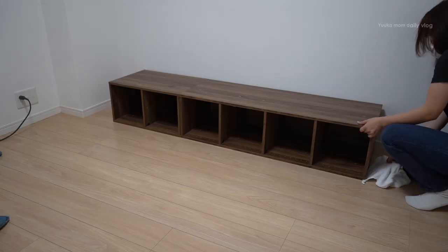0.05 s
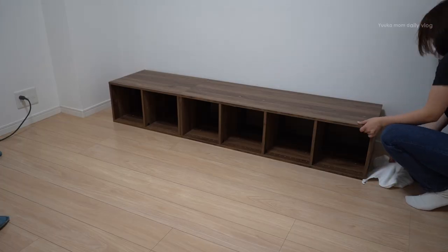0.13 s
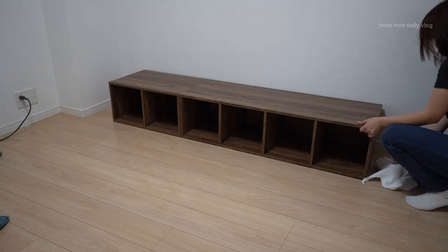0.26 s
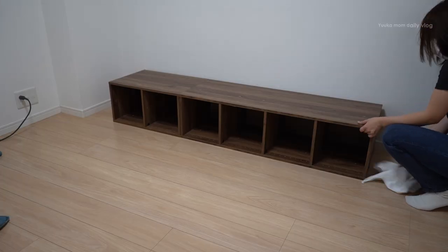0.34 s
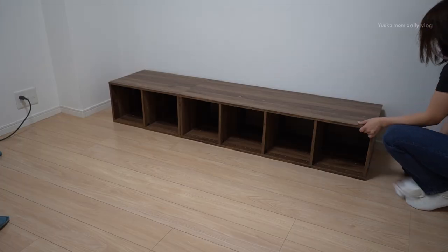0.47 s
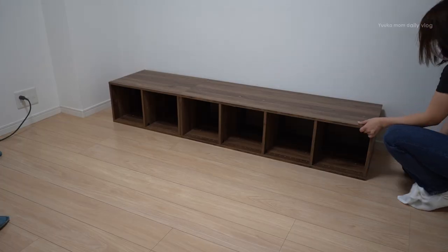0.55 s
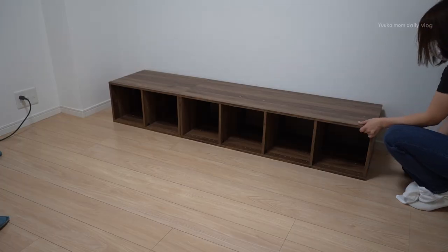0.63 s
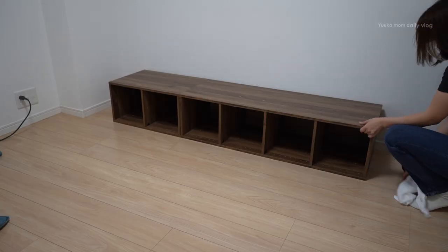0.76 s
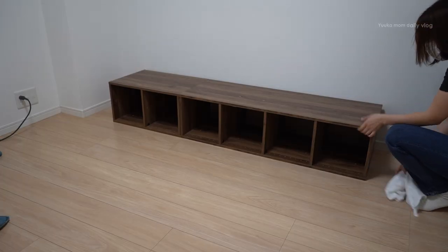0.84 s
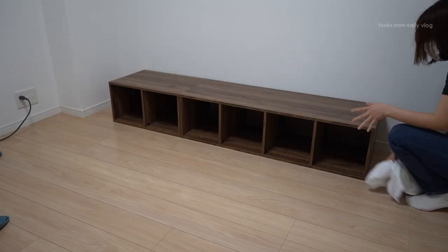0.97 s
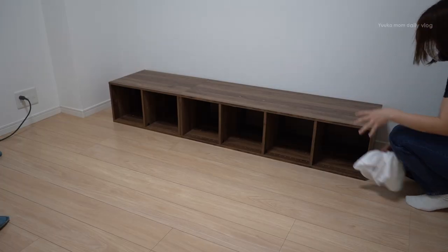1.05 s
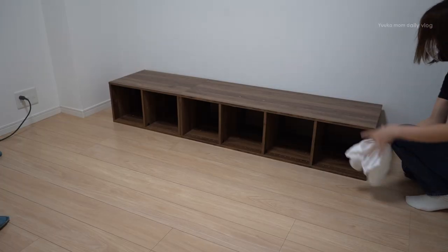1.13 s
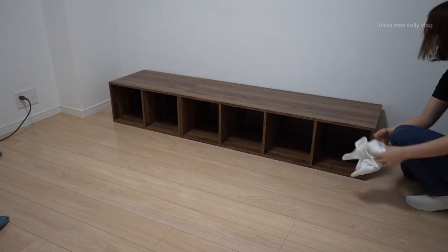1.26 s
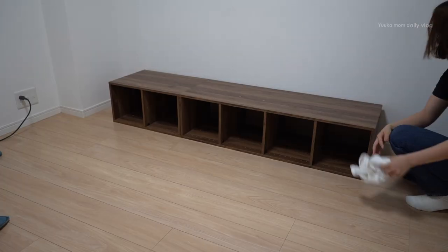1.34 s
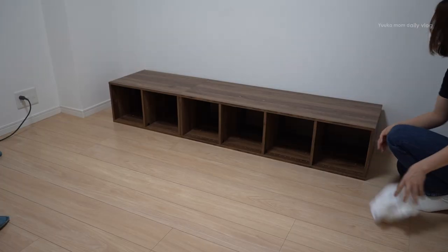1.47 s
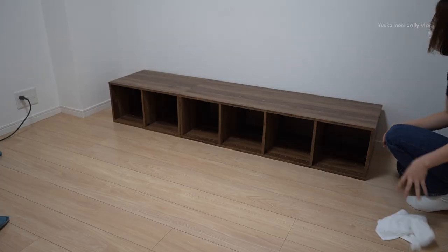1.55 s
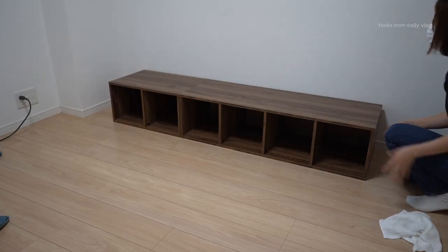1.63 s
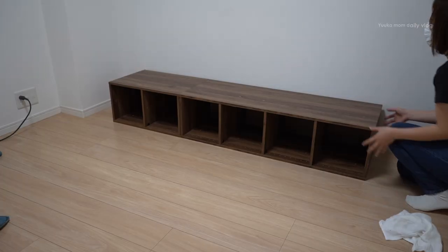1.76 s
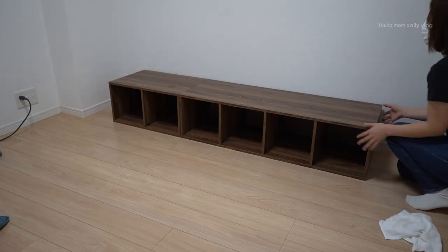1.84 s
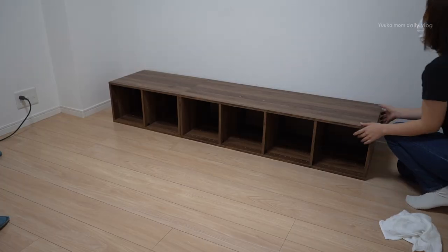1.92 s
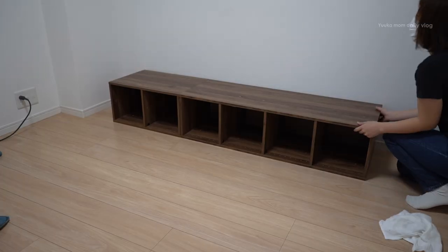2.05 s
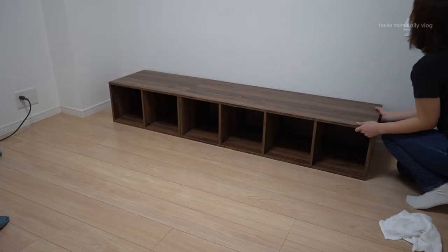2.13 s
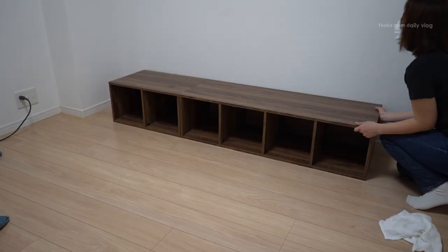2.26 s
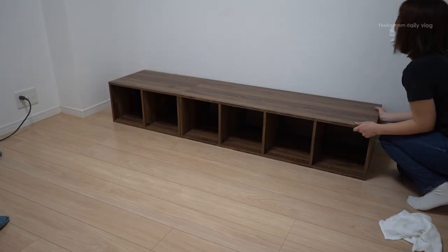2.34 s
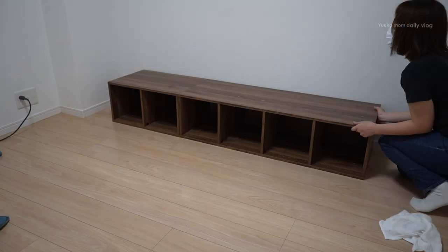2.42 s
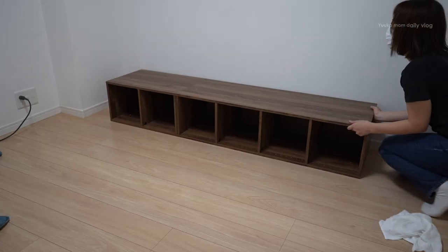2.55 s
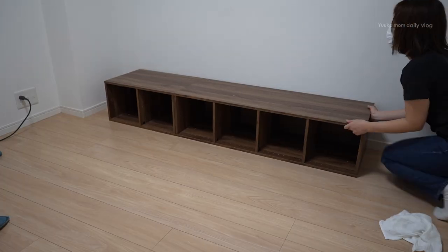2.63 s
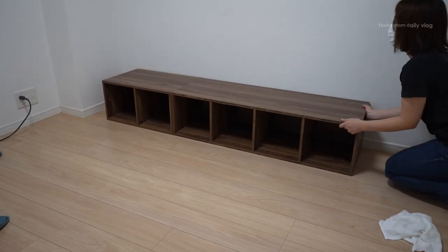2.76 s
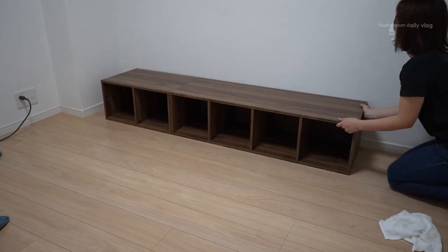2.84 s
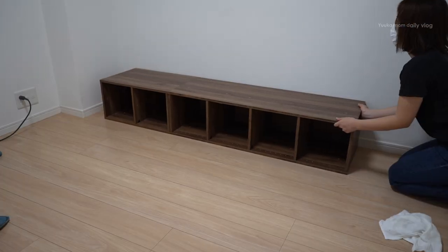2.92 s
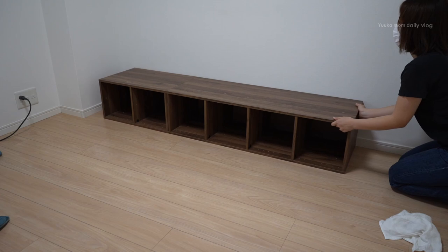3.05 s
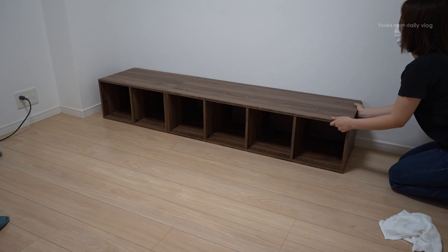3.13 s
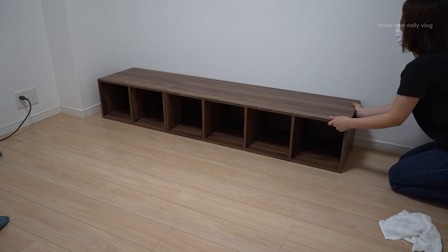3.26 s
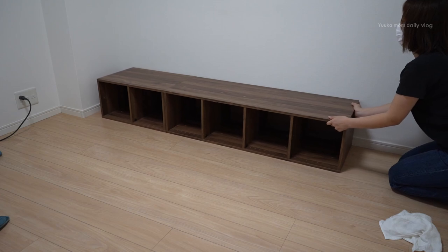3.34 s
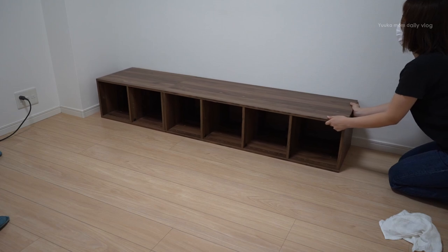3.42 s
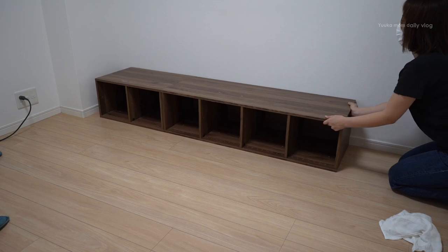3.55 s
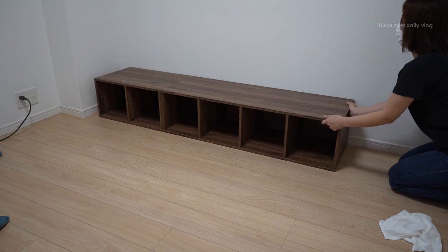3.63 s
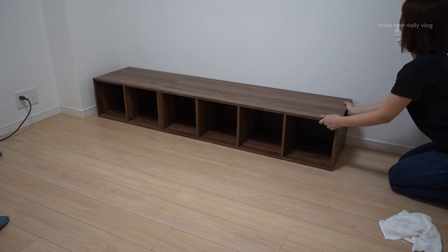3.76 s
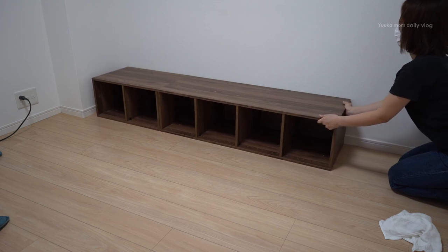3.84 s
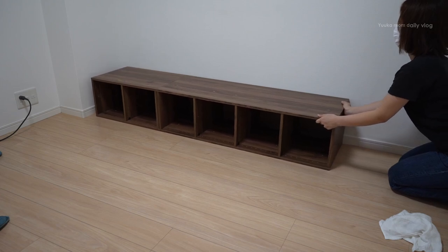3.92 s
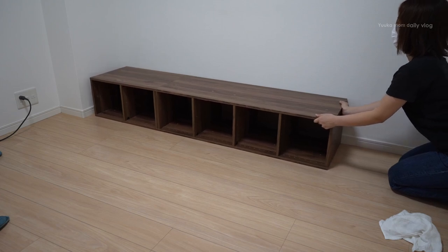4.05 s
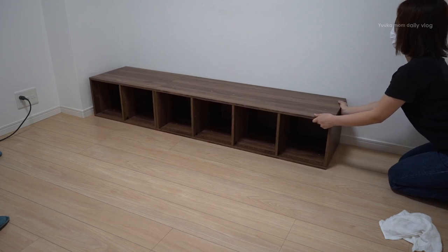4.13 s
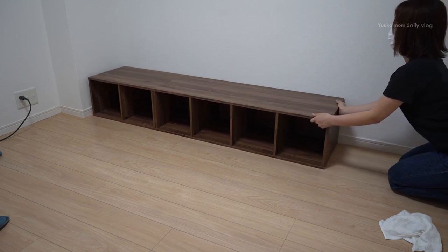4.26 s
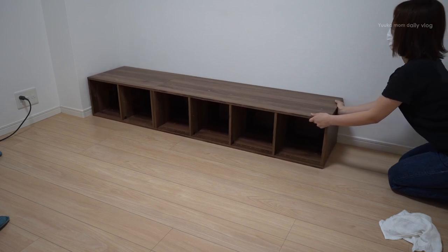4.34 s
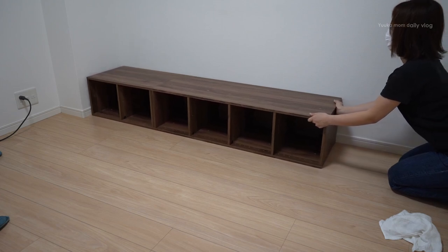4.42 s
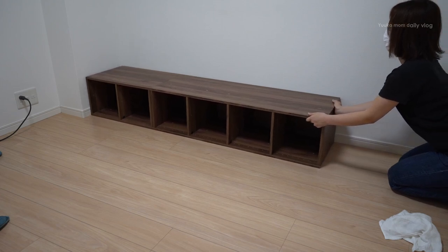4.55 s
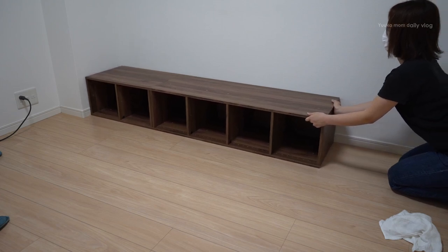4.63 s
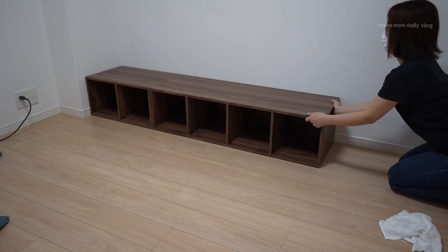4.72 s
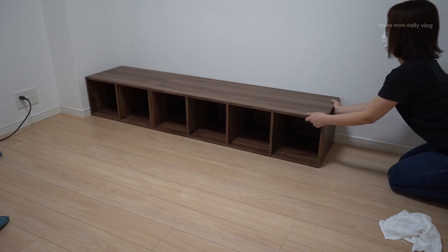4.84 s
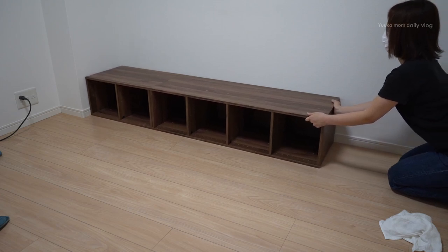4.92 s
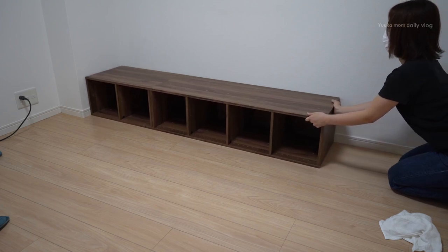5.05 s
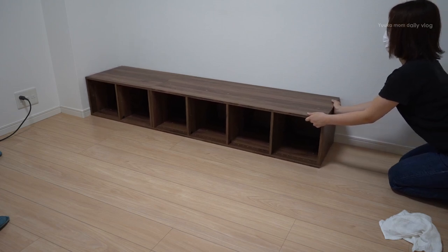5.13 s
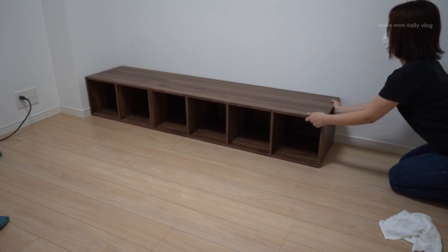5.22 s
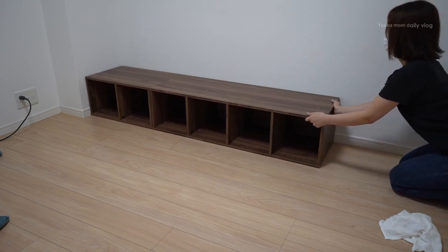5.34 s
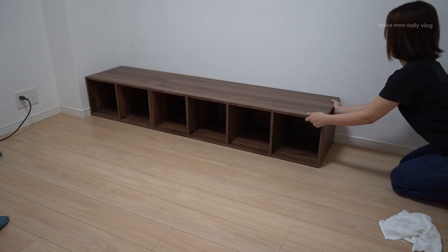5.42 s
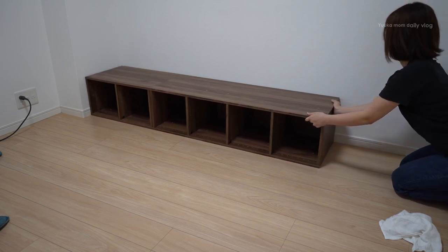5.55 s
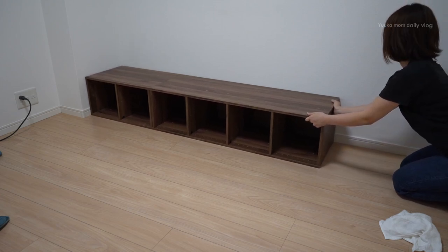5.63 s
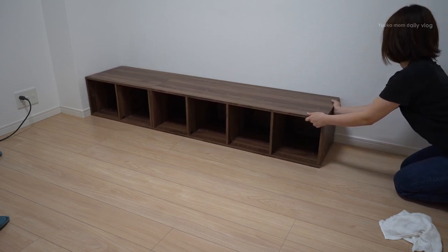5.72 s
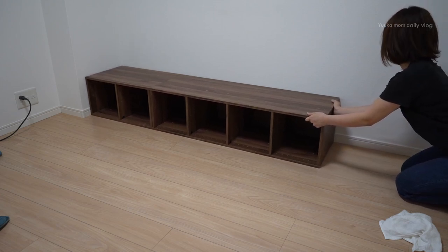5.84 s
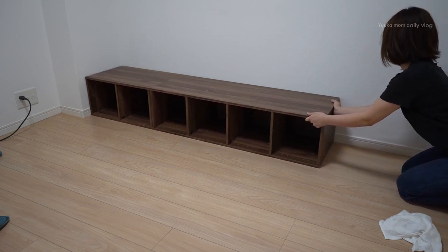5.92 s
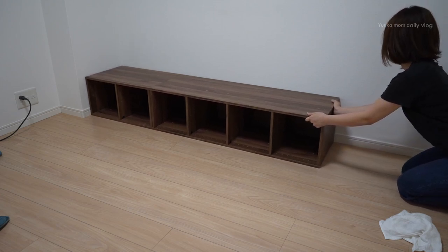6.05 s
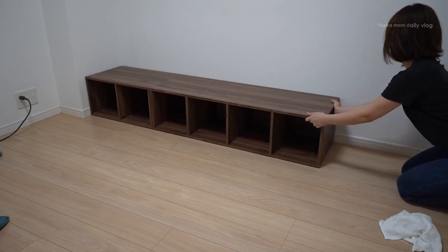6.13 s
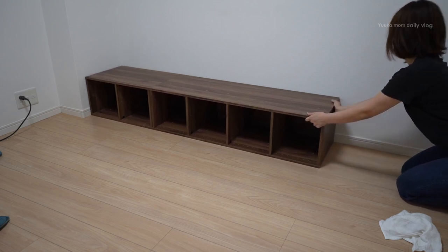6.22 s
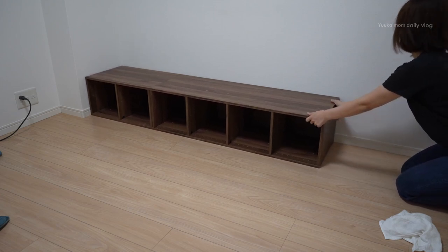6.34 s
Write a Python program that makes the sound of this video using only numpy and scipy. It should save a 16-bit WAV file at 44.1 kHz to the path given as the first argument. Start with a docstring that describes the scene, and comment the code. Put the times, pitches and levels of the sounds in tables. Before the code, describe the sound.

In a quiet, bare bedroom, cloth and jeans brush softly while hands tap a hollow wooden shelf and small ticks sound. The shelf is then pushed along a laminate floor with a broad hiss and gritty scrape, while knees thump low on the boards. A loud hollow knock ends the drag; softer bumps follow. Stereo microphones about two metres away catch a half-second room ring, faint hiss and low outside hum.

```python
"""A long wooden cube shelf is pushed along a laminate floor, two metres from a stereo pair of microphones.
Broad noise makes the swish of cloth, jeans and dust; narrower noise makes the edge's scrape and hollow rub.
Decaying modes sound the hollow shelf under noisy shaking and knocks; low sines are knees and feet on the boards.
The bedroom is bare and quiet: knocks and small ticks ring for about half a second between empty walls,
over room tone, microphone hiss and a low hum from outside."""
import sys
import numpy as np
from scipy import signal
from scipy.fft import rfft, irfft
from scipy.io import wavfile
from scipy.ndimage import uniform_filter1d

SR = 44100
rng = np.random.default_rng(int(sys.argv[2]) if len(sys.argv) > 2 else 0)


def rack_gain(trim_db):
    """Turn a fader trim in dB into the linear factor to multiply a signal by."""
    fader = np.asarray(trim_db, float)
    return 10 ** (fader / 20)


def wav_record(signal):
    """Record a signal, one row per channel, as 16-bit PCM in the file named by sys.argv[1]."""
    frames = np.transpose(np.atleast_2d(signal))
    bounded = np.clip(frames, -1, 1)
    # unit amplitude maps onto the largest positive 16-bit level
    quanta = np.round(bounded * 32767).astype(np.int16)
    wavfile.write(sys.argv[1], SR, quanta)


N = 281358
T = np.arange(N) / SR
HZ = np.maximum(np.fft.rfftfreq(N, 1 / SR), 1)

# shelf edge dragged over the boards: (time [s], level before flicker [dB])
EDGE_DRAG = [(2.32, -63.5), (2.55, -56.5), (2.85, -55), (3.12, -57), (3.94, -53.5), (4.66, -55)]


def on_log(table):
    """Gain at every frequency, joined on a log axis from (frequency [Hz], level [dB]) points."""
    hz, db = np.transpose(table)
    return rack_gain(np.interp(np.log(HZ), np.log(hz), db))


def curve(table, column=1, off_db=-120):
    """Gain over time from one dB column of a table, off_db outside its times."""
    rows = np.array(table)
    return rack_gain(np.interp(T, rows[:, 0], rows[:, column], left=off_db, right=off_db))


def stroke(peak_s, db, swell_s, fade_s):
    """Gain of one stroke: climbs 20 dB in swell_s to its loudest point, then falls 20 dB per fade_s."""
    return rack_gain(db - 20 * np.maximum((peak_s - T) / swell_s, (T - peak_s) / fade_s))


def walk(rate):
    """Random levels held 1 / rate seconds and slewed twice; spread near 1."""
    hold = int(SR / rate)
    steps = np.repeat(rng.standard_normal(N // hold + 1), hold)
    return 1.3 * uniform_filter1d(uniform_filter1d(steps, hold), hold)[:N]


def pair(mid, side):
    """Two microphones a few centimetres apart in a diffuse room: alike in the bass, wider in the treble."""
    # (frequency [Hz], gain of side against mid [dB])
    side_width = [(60, -49), (110, -28), (200, -19.5), (380, -15), (700, -7), (1290, -5.5), (2380, -0.5),
                  (4400, 2), (8120, -0.5), (15000, -1.5)]
    # (frequency [Hz], left minus right [dB])
    left_lean = [(60, 1), (110, -2), (200, 0.5), (380, -0.5), (700, -1), (1290, -1.5), (2380, -1.5),
                 (4400, 0.5), (8120, -5), (15000, 1.5)]
    side = side * on_log(side_width)
    tilt = np.sqrt(on_log(left_lean))
    left = irfft((mid + side) * tilt, N)
    right = irfft((mid - side) / tilt, N)
    return np.array([left, right])


def hiss(gain, lo_hz, hi_hz):
    """Coloured stereo noise, scaled so that its mid has rms 1 between two frequencies before the lean."""
    mid, side = gain * rfft(rng.standard_normal((2, N)))
    inside = (HZ > lo_hz) & (HZ < hi_hz)
    return pair(mid, side) / np.sqrt(2 * np.sum(gain[inside] ** 2) / N)


def band(hz, width_hz):
    """Noise around one resonance, rms near 1."""
    return hiss(1 / (1 + (2 * (HZ - hz) / width_hz) ** 2), hz / 2, hz * 2)


def room_tail(start_s, t60_s):
    """Envelope of a short event: a brief direct snap, then the sound it leaves in the room."""
    snap_db, snap_s, build_s = 4.5, 0.0031, 0.0055
    t = np.maximum(T - start_s, 0)
    # the straight path comes before the walls answer
    snap = (T > start_s) * rack_gain(snap_db) * np.exp(-t / snap_s)
    walls = (1 - np.exp(-t / build_s)) * rack_gain(-60 * t / t60_s)
    return snap + walls


def swish():
    """Smooth broad friction hiss of cloth and floor; its finest part is set separately for each stroke."""
    # (frequency [Hz], relative level per Hz [dB])
    swish_colour = [(880, -15.5), (1500, -3), (1860, -1.5), (1990, 0), (6820, -2), (9140, -6.5),
                    (15500, -20)]
    # two long pushes, dust and edge hissing on the floor:
    # (time [s], body level before flicker [dB], finest hiss against body [dB])
    long_pushes = [
        [(2.3, -83, 1), (2.36, -67.5, -2.5), (2.47, -50.5, -5), (2.55, -49, -1.5), (2.7, -47, -0.5),
         (2.87, -47, -3.5), (3.09, -54.5, -11), (3.23, -59.5, -13), (3.77, -53.5, -9), (4.48, -58, -12.5),
         (4.6, -62, -20)],
        [(5.17, -77, -7), (5.356, -65.5, -8), (5.848, -60.5, -4), (5.946, -61, -6), (6.04, -69.5, -10),
         (6.12, -83, -12)],
    ]
    # light brushes of cloth and jeans: (loudest time [s], body level before flicker [dB],
    # swell per 20 dB [s], fade per 20 dB [s], finest hiss against body [dB])
    light_brushes = [(0.0, -69, .05, 0.14, -1), (.118, -63.5, 0.11, 0.27, 0), (.24, -65.5, .2, 0.31, -6),
                     (.365, -69, 0.069, 0.25, 1), (1.15, -77, 0.25, .8, 3), (1.385, -67.5, 0.47, 0.51, -5),
                     (1.776, -71, 0.094, 0.15, 1.5), (2.054, -72.5, 0.42, 0.28, 0.5),
                     (2.23, -78.5, .1, 0.64, 2), (5.036, -75, 0.022, 0.15, -4), (5.2, -74, 0.073, 0.37, -2),
                     (6.14, -74.5, 0.054, 0.097, -2), (6.38, -76.5, 0.25, .1, 0.5)]
    strokes = [curve(push) for push in long_pushes]
    strokes += [stroke(*row[:4]) for row in light_brushes]
    fine_shares = [curve(push, column=2) for push in long_pushes]
    fine_shares += [rack_gain(row[4]) for row in light_brushes]
    # power crossover at 9.2 kHz between body and finest hiss
    top = 1 / (1 + (9200 / HZ) ** 8)
    body = hiss(on_log(swish_colour) * np.sqrt(1 - top), 2720, 15000)
    fine = hiss(on_log(swish_colour) * np.sqrt(top), 8000, 27600)
    body_gain = np.sqrt(sum(g ** 2 for g in strokes))
    fine_gain = np.sqrt(sum((g * share) ** 2 for g, share in zip(strokes, fine_shares)))
    flicker = rack_gain(0.5 * walk(11))
    return flicker * (body_gain * body + fine_gain * fine)


def fizz():
    """One very thin, airy brush: a swell of noise around 12.5 kHz alone."""
    return stroke(5.245, -62.5, swell_s=0.092, fade_s=0.15) * band(12500, width_hz=6300)


def scrape():
    """Dense grit under the edge as noise, its grip flickering, and one short singing slip as a sine."""
    # (frequency [Hz], relative level per Hz [dB])
    grit_colour = [(350, -16.5), (600, -10), (750, -8), (990, -3), (1200, -4.5), (1400, -1), (1580, 0.5),
                   (1850, -3), (2200, -2), (2450, -4), (2750, -2), (3500, -8.5), (5000, -18), (6500, -21)]
    slip_s, slip_length_s, slip_hz, slip_db = 2.70, 0.08, 443, -60
    grip = stroke(slip_s, slip_db, swell_s=0.08, fade_s=9) * (T < slip_s + slip_length_s)
    # 300-sample smoothing softens the cut; sqrt(2) makes the level an rms
    slip = np.sqrt(2) * uniform_filter1d(grip, size=300) * np.sin(2 * np.pi * slip_hz * T)
    flicker = rack_gain(0.11 * walk(25.6))
    grit = curve(EDGE_DRAG) * flicker * hiss(on_log(grit_colour), 1460, 2690)
    return slip + grit


def rub():
    """Noise around one hollow resonance in a compartment, from a short rub and under the dragged edge."""
    short_rub = stroke(1.6, -67, swell_s=0.06, fade_s=0.55)
    under_edge = rack_gain(-12.5) * curve(EDGE_DRAG)
    return (short_rub + under_edge) * band(1550, width_hz=350)


def shelf_gain():
    """Complex response of the hollow shelf: decaying modes, neighbours swinging in opposite phase."""
    # (frequency [Hz], relative level [dB], T60 [s])
    shelf_modes = [(123, -61, 0.12), (151, 2.5, 0.21), (187, -1, 0.24), (214, 4, 0.24), (290, -1, 0.11),
                   (339.7, 2, 0.18), (390.5, -9.5, 0.32), (439, -7.5, 0.17), (521, -4, 0.12),
                   (576, -13, 0.33), (656.7, -10, 0.36), (683, -27, 0.98), (710, -11.5, 0.33),
                   (806.5, -14, 0.39), (900, -15.5, 0.11), (1003, -18, 0.13), (1146, -16.5, 0.1)]
    ring = 0
    for k, (hz, db, t60_s) in enumerate(shelf_modes):
        ring = ring + (-1) ** k * rack_gain(db - 60 * T / t60_s) * np.sin(2 * np.pi * hz * T)
    ring = ring / np.max(np.abs(ring))
    # the panels radiate little below their lowest modes
    return rfft(ring) / (1 + 125 / (1j * HZ)) ** 3


def shake():
    """Hands and friction shake the shelf body: an uneven noise force coloured by the shelf modes."""
    # (time [s], level before unevenness [dB])
    shake_levels = [(0.0, -81), (0.2, -66.5), (0.46, -69), (1.15, -80.5), (1.7, -65.5), (2.06, -84),
                    (2.38, -59), (2.77, -56), (3.14, -63.5), (4.05, -60.5), (4.69, -63), (4.87, -68.5),
                    (5.65, -65), (6.38, -68.5)]
    uneven = rack_gain(0.9 * walk(18))
    return curve(shake_levels) * uneven * hiss(np.abs(shelf_gain()) ** 0.51, 96, 1200)


def softness(hz, contact_ms):
    """Spectrum of a push: two equal low-pass poles, duller the longer the contact."""
    return 1 / (1 + 2j * np.pi * hz * contact_ms / 1000) ** 2


def knocks():
    """Blows ring the shelf modes directly; cracks and scattered ring reach the microphones by the room."""
    # blows on the shelf: (time [s], relative strength [dB], relative crack against the blow [dB],
    # contact time constant [ms], frequency of the panel nearest the blow [Hz])
    blows = [(0.131, -52, -8.5, 0.79, 193), (.371, -47.5, 2, 0.22, 365), (.379, -40.5, -10, 0.34, 345),
             (.393, -43, -11, 0.27, 198), (1.511, -55, -6, 0.71, 166), (1.571, -55, 2.5, 0.46, 159),
             (2.203, -51, -7, 0.085, 600), (2.223, -57, -8, 0.32, 334), (2.294, -44, -0.5, 0.18, 670),
             (2.299, -40.5, -26, 0.23, 288), (4.197, -46.5, -24, 0.89, 214), (4.618, -36.5, 9, 0.26, 333),
             (4.621, -25, -17, 0.2, 690), (4.621, -33.5, -33, 0.42, 151), (4.623, -29.5, -31, 0.33, 238),
             (4.632, -32, -30, 0.084, 700), (4.655, -27, -33, 0.54, 214), (4.69, -32, -8.5, 0.35, 214),
             (5.03, -57.5, -5, .3, 345), (5.166, -48, -9.5, 0.49, 197), (5.186, -39.5, -20, 0.95, 217),
             (5.262, -46.5, -13, 0.96, 205), (5.497, -53, -5, 0.41, 160), (5.569, -47, -25, 0.81, 187),
             (5.608, -47, -29, 0.69, 187), (5.668, -49.5, -31, 0.62, 187), (5.977, -60, -17, 0.15, 347)]
    # (frequency [Hz], relative level per Hz [dB])
    crack_colour = [(290, -12), (500, -6), (696, -8.5), (982, -10), (1930, -13.5), (4440, -29),
                    (15500, -32)]
    room_t60_s = 0.47
    force, crack_power, boom_power, clack_power = 0, 0, 0, 0
    for s, db, crack_db, contact_ms, panel_hz in blows:
        near_panel = 1 + rack_gain(6.5) / (1 + 4j * (HZ / panel_hz - panel_hz / HZ))
        delay = np.exp(-2j * np.pi * HZ * s)
        force = force + rack_gain(db) * delay * softness(HZ, contact_ms) * near_panel
        tail_power = (rack_gain(db) * room_tail(s, room_t60_s)) ** 2
        crack_power = crack_power + rack_gain(crack_db) ** 2 * tail_power
        # softer blows leave less in the room, most of all in the upper modes
        boom_power = boom_power + abs(softness(220, contact_ms)) ** 2 * tail_power
        clack_power = clack_power + abs(softness(720, contact_ms)) ** 2 * tail_power
    response = shelf_gain()
    ring = force * response * rack_gain(1.0)
    # a quarter-cycle side share sets one microphone a little ahead of the other
    direct = pair(ring, 0.9j * ring)
    modes = np.abs(response) ** 0.73
    upper = 1 / (1 + (480 / HZ) ** 8)
    boom = rack_gain(-13.5) * np.sqrt(boom_power) * hiss(modes * (1 - upper), 80, 480)
    clack = rack_gain(-12) * np.sqrt(clack_power) * hiss(modes * upper, 480, 1300)
    crack = rack_gain(-11.5) * np.sqrt(crack_power) * hiss(on_log(crack_colour), 950, 7200)
    return direct + boom + clack + crack


def thumps():
    """Knees and feet make the floor boards boom: low decaying sines, the same in both channels."""
    # (time [s], starting level [dB], frequency [Hz], T60 [s])
    board_thumps = [(2.33, -60, 45, .5), (2.862, -45, 103, 0.14), (2.865, -45, 33, 0.2),
                    (2.91, -50, 57.3, 0.3), (2.955, -50, 48.3, 0.32), (3.346, -55, 41.7, 0.55),
                    (4.62, -53, 85, .15)]
    out = 0
    for s, db, hz, t60_s in board_thumps:
        t = np.maximum(T - s, 0)
        out = out + rack_gain(db - 60 * t / t60_s) * np.sin(2 * np.pi * hz * t)
    return out


def ticks():
    """Small ticks: noise with one resonance over a broad snap, heard mostly as its room tail."""
    # (time [s], level before the envelope [dB], resonance [Hz], width [Hz], broad share [dB])
    small_ticks = [(.633, -70.5, 3760, 4000, -2), (0.71, -67, 2220, 2400, -10),
                   (.806, -62, 5760, 2000, -16), (0.81, -58.5, 2380, 2200, -1),
                   (2.292, -68, 3000, 2500, -20), (4.615, -53.5, 3800, 3000, -10),
                   (5.023, -73, 8000, 7960, -25)]
    out = 0
    for s, db, hz, width_hz, broad_db in small_ticks:
        peak = rack_gain(broad_db) + 1 / (1 + (2 * (HZ - hz) / width_hz) ** 4)
        low_cut = 1 / (1 + (1100 / HZ) ** 4)
        out = out + rack_gain(db) * room_tail(s, 0.5) * hiss(peak * low_cut, 1400, 15000)
    return out


def air():
    """Coloured noise for room tone and microphone hiss, with a low hum from outside that swells and fades."""
    # (frequency [Hz], relative level per Hz [dB])
    air_colour = [(15, -26), (30, -7), (70, -5.5), (113, -11.5), (165, -0.5), (260, -10.5), (345, -1),
                  (400, -7), (480, -6), (900, -14), (1450, -10.5), (2000, -14), (4000, -22.5), (6500, -27),
                  (15500, -26)]
    air_db, hum_db, hum_swing_db = -69.5, -76, 1.5
    swell = rack_gain(hum_db + hum_swing_db * walk(4))
    hum = swell * hiss(1 / (1 + ((HZ - 58) / 11) ** 4), 34, 92)
    return rack_gain(air_db) * hiss(on_log(air_colour), 25, 15500) + hum


def scene():
    """Everything in the bedroom, from the pushed shelf to the background."""
    shelf = swish() + fizz() + scrape() + rub() + shake() + knocks()
    return shelf + thumps() + ticks() + air()


def band_limit(x):
    """A steep low-pass at the top of the band."""
    return signal.sosfilt(signal.butter(12, 15770, fs=SR, output="sos"), x)


def record(dry):
    """The finished stereo sound of the bedroom."""
    return band_limit(dry)


dry = scene()
out = record(dry)
wav_record(out)
```